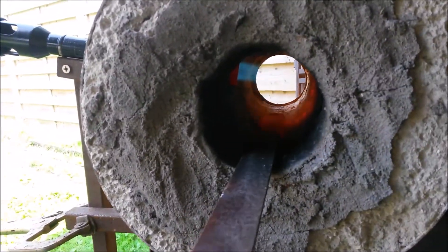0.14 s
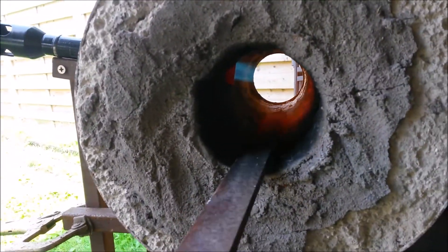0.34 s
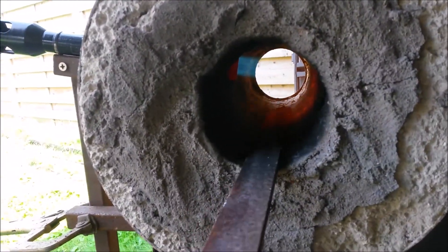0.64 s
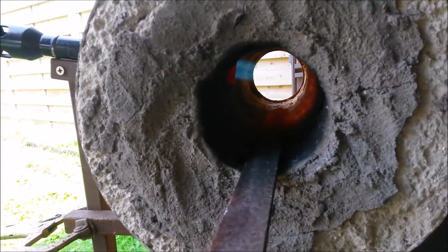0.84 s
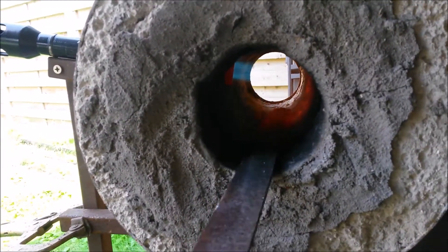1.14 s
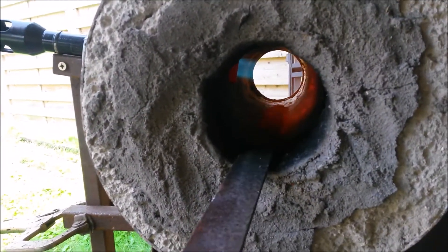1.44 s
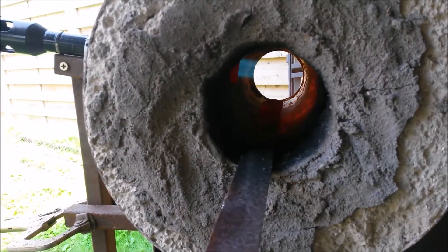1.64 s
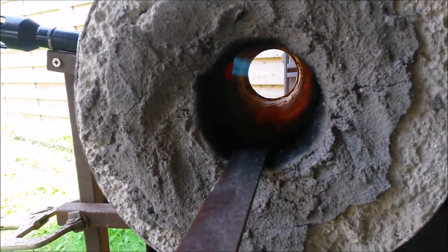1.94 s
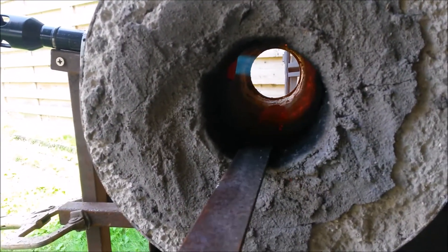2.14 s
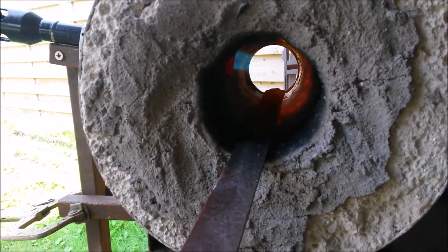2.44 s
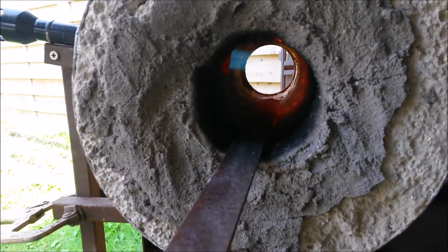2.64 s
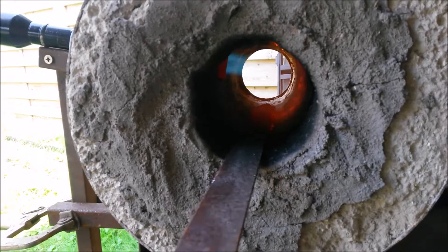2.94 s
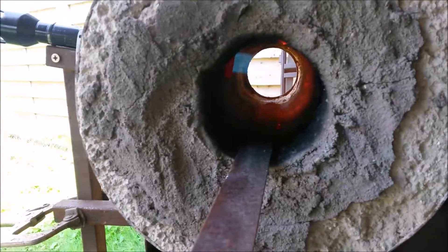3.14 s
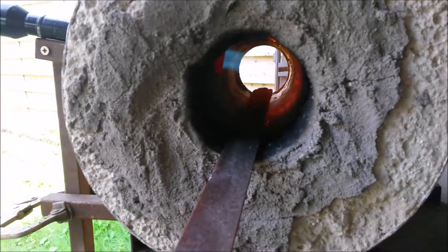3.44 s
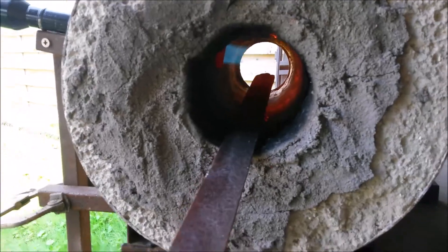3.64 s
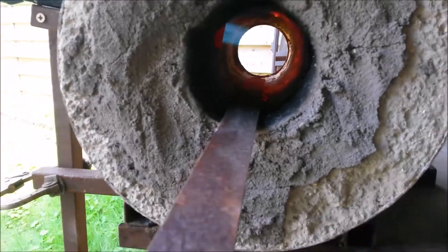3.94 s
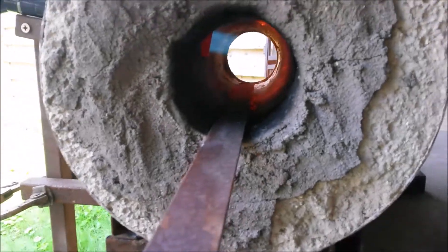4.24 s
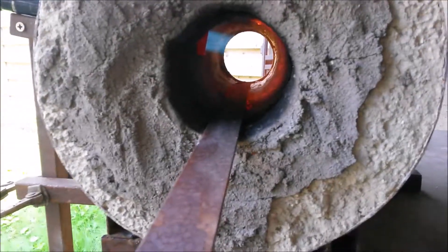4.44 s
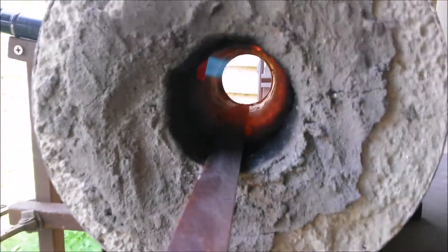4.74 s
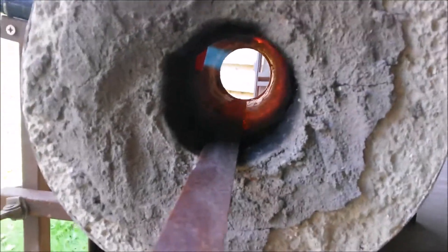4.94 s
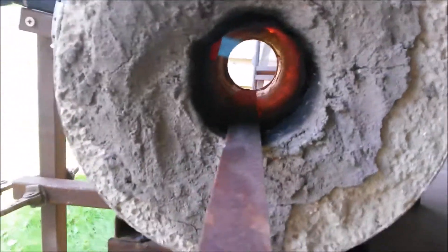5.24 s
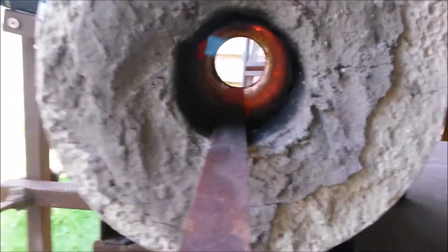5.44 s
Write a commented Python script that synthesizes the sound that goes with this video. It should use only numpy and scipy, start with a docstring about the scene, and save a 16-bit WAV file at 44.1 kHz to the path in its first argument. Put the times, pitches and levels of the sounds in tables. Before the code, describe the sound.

Close stereo pickup at the mouth of a small gas forge. A steady, fluttering flame roar with a bright gas hiss runs throughout, with small flares and hollow pops. A steel bar scrapes lightly on the gritty lining from the start, with ticks and thin squeaks, busiest around three seconds. Just after four seconds it clatters sharply for a fifth of a second, then a few soft scrapes follow.

```python
"""A gas burner fires into a small lined forge: all along, filtered noise makes the hissing jet and the roaring flame.
Gas pockets ignite now and then: the fire flares briefly and a push of pressure rings in the mouth.
From the start a flat steel bar, pushed to and fro, scrapes over the lining: gritty noise, ticks, squeaks, ringing modes.
After four seconds it knocks on the lining a few times: impulses and crunching noise excite its bending modes.
The two microphones are close to the opening."""
import sys
import numpy as np
from scipy import signal
from scipy.fft import rfft, irfft
from scipy.io import wavfile
from scipy.ndimage import uniform_filter1d, map_coordinates

SR = 44100
rng = np.random.default_rng(int(sys.argv[2]) if len(sys.argv) > 2 else 0)


def transcribe(signal):
    """Save signal, clipped to [-1, 1], as a 16-bit WAV file at the path in sys.argv[1]."""
    frames = np.atleast_2d(signal).T
    limited = np.clip(frames, -1, 1)
    pcm = np.round(limited * 32767).astype(np.int16)
    wavfile.write(sys.argv[1], SR, pcm)


N = 246519
TIME = np.arange(N) / SR   # s
BINS = np.maximum(np.arange(N // 2 + 1) * SR / N, 1)   # Hz; at least 1, for the log axis

# the bar catches on the lining; bite and squeak are relative to level_db, place is a share of the bar's length:
# centre_s (middle of the burst), level_db (before the gains), length_s, bite_db, squeak_db, place
CATCHES = [(.283, -35, .008, -9, -15, 0.38), (0.419, -35, .015, -6, -20, .34),
           (.488, -28.5, .005, -6, 6, 0.22), (.701, -25, .008, -12, 10.5, 0.24),
           (1.269, -30, .006, -10, -6, .346), (1.288, -26, .005, -6, 5, 0.065),
           (1.313, -33, 0.0055, -7, -10, 0.074), (2.118, -27, .005, -6, 5, 0.067),
           (2.474, -30, .007, -9, -12, 0.37), (2.94, -32, .055, -20, -25, .18),
           (2.996, -31, 0.007, -2, -15, 0.18), (3.021, -29.5, .014, -12, -15, .358),
           (3.052, -34, 0.02, -8, -20, .342), (3.099, -26, .008, -8, -20, .378),
           (3.113, -23, .016, -14, -20, .378), (3.205, -21.5, .013, -20, -15, .27),
           (4.078, -27, .025, -22, -25, .09), (4.165, -34, .02, -12, -25, .1),
           (5.11, -32, .05, -28, -25, .17)]
SLIDING_PLACE = .167   # where the sliding bar rests, as a share of its length


def from_db(db):
    """Amplitude gain is ten to the power of a twentieth of the decibels."""
    return 10 ** (np.asarray(db) / 20)


def rms_one(x):
    """Normalization: divide by the root of the mean power."""
    return x / np.sqrt(np.mean(x ** 2) + 1e-20)


def in_time(rows):
    """Linear interpolation of each column of a curve at every sample."""
    s, *columns = np.transpose(rows)
    return [np.interp(TIME, s, column) for column in columns]


def at_bins(points, axis=1):
    """Interpolation of one column of a spectrum on a logarithmic frequency axis."""
    columns = np.transpose(points)
    return np.interp(np.log(BINS), np.log(columns[0]), columns[axis])


def lifts(resonances):
    """Resonance: each adds a bell-shaped lift in dB, halved at half its width from the centre."""
    return sum(db / (1 + (2 * (BINS - hz) / width) ** 2) for hz, width, db in resonances)


def panned(db):
    """Constant-power panning: left and right gains for a level difference, left minus right."""
    ratio = from_db(np.atleast_1d(db))
    return np.array([ratio, np.ones_like(ratio)]) * np.sqrt(2 / (1 + ratio ** 2))


def drift(rate_hz):
    """Random fluctuation: noise low-passed at about the given rate; rms 1."""
    spectrum = rfft(rng.standard_normal(N))
    return rms_one(irfft(spectrum / (1 + (BINS / rate_hz) ** 2), N))


def split(x, hz):
    """Complementary filters: the parts below and above a frequency add up to the whole."""
    low = irfft(rfft(x) / (1 + (BINS / hz) ** 8), N)
    return low, x - low


def running_rms(x, seconds):
    """Short-time level: root of the mean power of both channels in a sliding window."""
    power = np.mean(x ** 2, axis=0)
    return np.sqrt(uniform_filter1d(power, int(seconds * SR)) + 1e-12)


def swells(bursts):
    """Powers add: one envelope of bell-shaped bursts (centre_s, level_db, length_s)."""
    power = 0
    for centre, db, length in bursts:
        bell = np.exp(-np.minimum((2 * (TIME - centre) / length) ** 2, 60))
        power = power + from_db(db) ** 2 * bell
    return np.sqrt(power)


def ring(force, hz, t60):
    """Damped oscillator: a unit click starts a sine of height 1 that falls by 60 dB in t60 seconds."""
    r = np.exp(-np.log(1000) / (t60 * SR))
    w = 2 * np.pi * hz / SR
    return signal.lfilter([0, np.sin(w)], [1, -2 * r * np.cos(w), r * r], force + 1e-18)


def wandering(x, share, rate_hz):
    """Uneven reading speed shifts every resonance of a noise by a drifting share of its frequency (rms)."""
    position = np.cumsum(1 + share * drift(rate_hz))
    return np.array([map_coordinates(channel, [position], order=3, mode="mirror") for channel in x])


def turbulence(colour_db):
    """Coherence: turbulent noise reaches both microphones alike in the bass, nearly unrelated in the treble; rms 1."""
    # difference between the channels: frequency_hz, left_minus_right_db
    balance = [(100, -3), (600, -3), (1000, -1), (1700, 4), (2100, 1), (2700, -12.5), (3200, -0.5),
               (3800, 3), (4300, 0.5), (6400, -3.5), (7100, -5.5), (7900, -14), (10000, -10.5),
               (14000, -13.5)]
    # likeness of the channels, 1 for equal: frequency_hz, likeness, left_lead_rad
    likeness = [(100, 0.99, 0), (704, 0.9995, 0), (1220, 1, 0.5), (1550, 1, -1), (1870, 0.73, -1.37),
                (2740, 0.71, -4.5), (3386, 0.66, -5.5), (4040, 0.65, -6), (5450, 0.43, -8.5),
                (6660, 0.12, -9.5), (9100, .1, -11.5)]
    mid, side = rfft(rng.standard_normal((2, N)))
    alike = np.clip(at_bins(likeness), -1, 1)
    pair = np.sqrt(1 + alike) * mid + np.sqrt(1 - alike) * side * [[1], [-1]]
    pair[0] *= np.exp(1j * at_bins(likeness, axis=2))   # the paths to the two microphones differ
    return rms_one(irfft(pair * from_db(colour_db) * panned(at_bins(balance)), N))


def pockets():
    """Random ignition: pockets with exponential waiting times join those at set moments."""
    # ignitions at set moments, levels before the gains: start_s, flare_db, pop_db
    set_ignitions = [(.148, -21, -27), (.266, -40, -7.5), (.528, -22, -16), (.572, -27, -8),
                     (.829, -38, -11), (.874, -20, -12), (.977, -34, -6), (1.504, -30, -10),
                     (2.548, -19, -29), (3.142, -25, -13), (3.308, -20, -12), (3.781, -28, -20),
                     (4.337, -33, -13), (4.399, -22, -9), (5.201, -19, -7.5)]
    per_s, mean_flare_db, mean_pop_db, spread_db = 3, -32, -16, 4   # the random pockets
    chance = rng.random((100, 3))
    starts = np.cumsum(-np.log(1 - chance[:, 0])) / per_s
    sizes_db = spread_db * (2 * chance[:, 1:] - 1) + [mean_flare_db, mean_pop_db]
    return set_ignitions + [(s, *db) for s, db in zip(starts, sizes_db) if s < TIME[-1]]


def flaring(ignitions, rise_s, gain_db):
    """Transient combustion: each pocket's extra burning swells within milliseconds and dies away."""
    flare = np.zeros(N)
    for s, flare_db, _ in ignitions:
        age = np.clip((TIME - s) / rise_s, 0, 20)
        flare += from_db(flare_db + gain_db) * age * np.exp(1 - age)
    return flare


def jet(flutter, flare, tube_flutter_db, top_flutter_db, tube_flare):
    """Jet noise coloured by tube resonances that wander with the flow; its lower part shakes with the flame."""
    # colour of the jet: frequency_hz, density_db (per Hz, relative)
    colour = [(900, -7.5), (1600, 5.5), (2300, 5), (3100, -3.5), (5000, -1), (6500, 0.5), (7500, -1.5),
              (8600, -5.5), (9600, -10), (12200, -7), (13000, -17), (14400, -23)]
    # resonances of the burner tube: frequency_hz, width_hz, lift_db
    tube_resonances = [(3685, 250, 9.5), (4250, 210, 7.5), (4480, 200, -1.5), (7830, 570, 10)]
    # the gas jet wavers slowly: time_s, level_db (of the hiss before the flutter)
    wavering = [(0, -37), (1.15, -36.5), (1.75, -38), (3.0, -36), (4.5, -36), (5.3, -38.5), (5.59, -36.5)]
    level_db, = in_time(wavering)
    hiss = turbulence(at_bins(colour) + lifts(tube_resonances))
    hiss = wandering(hiss, share=.013, rate_hz=4)
    tube, top = split(hiss, hz=7800)
    tube = tube * from_db(tube_flutter_db * flutter) * (1 + tube_flare * flare)
    top = top * from_db(top_flutter_db * drift(rate_hz=16))
    return from_db(level_db) * (tube + top)


def flame(flutter, flare, rumble_db, rasp_db, roar_flutter_db, rasp_flutter_db, roar_flare):
    """Combustion noise excites the chamber's resonances; the small, bright eddies flutter most."""
    # colour of the flame heard through the mouth: frequency_hz, density_db (per Hz, relative)
    colour = [(20, -44), (48, -18), (62, -17.5), (85, -7), (120, -7.5), (170, -3), (250, -8), (370, -4.5),
              (560, 0.5), (720, -6.5), (950, -14.5), (1200, -13.5), (1500, -22), (1950, -29.5), (2400, -59),
              (4000, -47)]
    # resonances of the chamber and the notches between them: frequency_hz, width_hz, lift_db
    chamber = [(141.6, 14, 4.5), (179, 14, 2.5), (258.5, 21, -6.5), (289.5, 81, 4), (375, 10, -7.5),
               (471.6, 46, 3.5), (550, 41, 1.5), (632, 35, 1), (688, 16.4, 5.5), (737, 28, 0),
               (766, 20, 5.5), (800, 13, -3.5), (859, 78, 5.5), (1072, 34, 2.5), (1925, 30, 9)]
    # one possible course of the rumble's random level drift: time_s, level_db (before rumble_db is added)
    rumble_course = [(0.0, -26), (0.73, -23.9), (0.95, -25.5), (1.52, -23), (1.8, -29), (2.0, -24),
                     (2.26, -24), (2.76, -25.5), (3.27, -24), (3.63, -26.5), (4.4, -24.5), (4.92, -25.5),
                     (5.25, -23.0), (5.58, -27)]
    course_db, = in_time(rumble_course)
    upper_level_db = -21   # the flame burns steadily
    rumble, upper = split(turbulence(at_bins(colour) + lifts(chamber)), hz=265)
    roar, rasp = split(upper, hz=920)
    roar = roar * from_db(roar_flutter_db * flutter) * (1 + roar_flare * flare)
    rasp = rasp * from_db(rasp_db + rasp_flutter_db * flutter) * (1 + flare)
    upper = roar + rasp
    # the steady gas supply holds the power of the flame within bounds
    rumble = rumble / running_rms(rumble, seconds=0.17) * from_db(course_db + rumble_db)
    upper = upper / running_rms(upper, seconds=0.16) * from_db(upper_level_db)
    return rumble + upper


def popping(ignitions, mouth_hz, t60, gain_db, pan_db):
    """Impulse response: the pressure push of an igniting pocket rings briefly in the mouth."""
    pushes = np.zeros(N)
    for s, _, pop_db in ignitions:
        pushes[round(s * SR)] = from_db(pop_db + gain_db)
    return panned(pan_db) * ring(pushes, mouth_hz, t60)


def bar_rings(forces, places):
    """Modal synthesis: a mode with a node at the place of contact stays quiet; each radiates its own way."""
    # bending modes of the steel bar: half_waves (along the bar), frequency_hz, level_db (relative), t60_s,
    # left_minus_right_db
    modes = [(6, 2309, -10.5, .15, -7), (7, 3060, -8, .09, -10), (8, 3930, -1.5, .032, -20),
             (9, 4880, -1.5, .05, -15), (10, 5918, -1, .05, 1), (11, 7088, 2.5, .036, -20),
             (12, 8350, -.5, .025, -14), (13, 9670, -7.5, .03, -12), (14, 11130, -5.5, .018, -17),
             (15, 12600, -13, .025, -12), (16, 14200, -17, .025, 2)]
    node_leak = .2   # a contact has some width, so it stirs a mode even at its node
    sound, forces = 0, np.array(forces)
    for waves, hz, db, t60, pan_db in modes:
        reach = np.hypot(np.cos(np.pi * waves * np.array(places)), node_leak)
        sound = sound + from_db(db) * panned(pan_db) * ring(reach @ forces, hz, t60)
    return sound


def grains(per_s):
    """Shot noise: tiny collisions of steel and grit at random moments; rms 1."""
    return rms_one((rng.random(N) < per_s / SR) * rng.standard_normal(N))


def cracks(force, t60, pan_db):
    """Convolution: a dry contact is scattered by the rough walls of the mouth, as decaying noise."""
    band = signal.butter(2, [4350, 9100], "band", fs=SR, output="sos")   # Hz
    decay = np.exp(-np.minimum(np.log(1000) * TIME / t60, 60))
    scatter = rms_one(rng.standard_normal((2, N)) * decay) / np.sqrt(N)   # mean energy 1
    return panned(pan_db) * irfft(rfft(signal.sosfilt(band, force)) * rfft(scatter), N)


def squeaking(pan_db):
    """Stick-slip oscillation: a thin, wavering sine at each catch, prominent at a few."""
    centre_hz, waver_hz, gain_db = 8024, 23, -7.5
    centre_s, db, length, _, squeak_db, _ = np.transpose(CATCHES)
    phase = 2 * np.pi * np.cumsum(centre_hz + waver_hz * drift(rate_hz=83)) / SR
    envelope = swells(zip(centre_s, db + squeak_db + gain_db, 1.64 * length))
    return panned(pan_db) * envelope * np.sin(phase)


def scraping(grit_db, ring_db, slide_ring_db, catch_db, pan_db):
    """Friction excitation: grit rasps under the bar; where the steel bites, the modes of that spot ring."""
    # colour of the grit under the bar: frequency_hz, density_db (per Hz, relative)
    grit_colour = [(1500, -4.5), (3000, -10), (6000, -11.5), (7500, 3), (8200, 5.5), (8800, -2),
                   (9700, -6.5), (11000, -16), (14500, -44)]
    # the bar slides on the floor of the chamber: time_s, rubbing_db (before the gains)
    slide = [(0, -45), (.65, -42.5), (.95, -48), (1.3, -40.5), (1.85, -45.5), (2.05, -35.5), (2.25, -52),
             (2.85, -48), (2.95, -34), (3.12, -38), (3.6, -43), (4.1, -33.5), (4.6, -44.5), (5.0, -42),
             (5.15, -32.5), (5.35, -45.5), (5.59, -39.5)]
    slide_db, = in_time(slide)
    rub = from_db(slide_db + catch_db * np.minimum(drift(rate_hz=10), 2))   # the bar catches and slips
    centre_s, db, length, bite_db, _, places = np.transpose(CATCHES)
    stroke = np.hypot(rub, swells(zip(centre_s, db, length)))
    grit = np.array([grains(per_s=3500), grains(per_s=3500)])
    grit = rms_one(irfft(rfft(grit) * from_db(at_bins(grit_colour)), N))
    # finer grains click at random under the sliding bar
    ticks_per_s, tick_db = 9, -7
    clicks = (rng.random(N) < ticks_per_s / SR) * rng.random(N)
    clicks = from_db(slide_db + tick_db) * clicks
    # rubbing is softer than a knock and favours the low modes
    soft = signal.butter(1, 4000, fs=SR, output="sos")   # Hz
    friction = from_db(ring_db) * signal.sosfilt(soft, grains(per_s=10000))
    bites = [friction * swells([catch]) for catch in zip(centre_s, db + bite_db, length)]
    sliding = friction * rub * from_db(slide_ring_db) + clicks
    rasping = from_db(grit_db) * panned(pan_db) * grit * stroke
    return rasping + bar_rings([sliding, *bites], [SLIDING_PLACE, *places])


def ticking(gain_db, ring_db, t60, pan_db):
    """Impulsive fracture: a breaking grain gives one dry crack and barely rings the bar."""
    # coarse grains crack under the bar with a dry tick: start_s, level_db (before the gains)
    fractures = [(0.195, -18.5), (.282, -20), (0.484, -20), (.689, -17), (.699, -17), (1.181, -22),
                 (1.286, -26), (1.31, -26), (1.989, -26), (2.115, -24), (2.152, -22), (2.469, -21),
                 (2.78, -20), (2.885, -24), (2.96, -19), (2.966, -19), (2.995, -17), (3.098, -12),
                 (3.111, -29), (3.144, -22)]
    force = np.zeros(N)
    for s, db in fractures:
        force[round(s * SR)] = from_db(db)
    dry_cracks = from_db(gain_db) * cracks(force, t60, pan_db)
    return dry_cracks + from_db(ring_db) * bar_rings([force], [SLIDING_PLACE])


def knocking(ring_db, chatter_db, chatter_ring_db, crack_db, crack_t60, pan_db):
    """Impact excitation: one hard contact amid crunching grit; the spot that touches picks the modes that ring."""
    # the bar strikes the lining and chatters: centre_s (hard contact and middle of the crunch),
    # level_db (before the gains), length_s (of the crunch), place (of contact, as a share of the bar's length)
    strikes = [(4.0003, -12, .002, 0.24), (4.027, -24, .003, .184), (4.0534, -19, .0015, .27),
               (4.062, -24, .009, 0.24), (4.076, -16, .005, 0.29), (4.0783, -16, .004, 0.083),
               (4.099, -25, 0.014, 0.49), (4.113, -30, .012, 0.51), (4.1286, -26, .002, 0.21),
               (4.137, -25, .014, .208), (4.155, -25, 0.015, 0.088), (4.166, -20.5, 0.0082, 0.11),
               (4.186, -30, .012, .4)]
    force, blows = 0, []
    chatter = from_db(chatter_db) * grains(per_s=15000)
    for centre_s, db, length, _ in strikes:
        contact = np.zeros(N)
        contact[round(centre_s * SR)] = from_db(db)
        crunch = chatter * swells([(centre_s, db, length)])
        blows.append(contact + from_db(chatter_ring_db) * crunch)
        force = force + contact + crunch
    # a short, hard knock barely moves the lowest mode
    hard = signal.butter(2, 2700, "high", fs=SR, output="sos")   # Hz
    rings = signal.sosfilt(hard, bar_rings(blows, [place for *_, place in strikes]))
    return from_db(ring_db) * rings + from_db(crack_db) * cracks(force, crack_t60, pan_db)


def scene():
    """Superposition: flame and jet share one unsteady flow; the bar moves in front of them."""
    ignitions = pockets()
    flutter = drift(rate_hz=35)
    flare = flaring(ignitions, rise_s=0.0027, gain_db=21.5)
    gas = jet(flutter, flare, tube_flutter_db=1.65, top_flutter_db=1.5, tube_flare=0.88)
    fire = flame(flutter, flare, rumble_db=0.5, rasp_db=-0.5, roar_flutter_db=1.2, rasp_flutter_db=2.0,
                 roar_flare=0.24)
    pops = popping(ignitions, mouth_hz=656, t60=0.021, gain_db=-1.0, pan_db=-2.0)
    squeaks = squeaking(pan_db=-22)
    scrapes = scraping(grit_db=-4.0, ring_db=-19.0, slide_ring_db=-20.0, catch_db=2.5, pan_db=-13.5)
    ticks = ticking(gain_db=13.0, ring_db=-20.0, t60=0.035, pan_db=-9)
    knocks = knocking(ring_db=-7.0, chatter_db=-21.0, chatter_ring_db=-9.0, crack_db=11, crack_t60=0.022,
                      pan_db=-4)
    return gas + fire + pops + squeaks + scrapes + ticks + knocks


def record(dry):
    """Band limiting: the microphones lose the deepest bass; the top is cut steeply."""
    bass_cut = signal.butter(2, 34, "high", fs=SR, output="sos")   # Hz
    top_cut = signal.ellip(12, .1, 90, 14750, fs=SR, output="sos")   # ripple dB, stopband dB, Hz
    return signal.sosfilt(top_cut, signal.sosfilt(bass_cut, dry))


dry = scene()
out = record(dry)
transcribe(out)
```